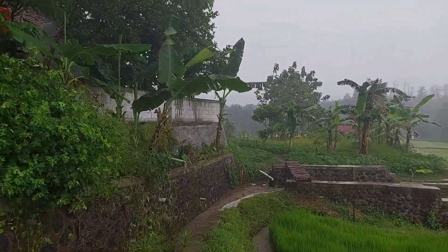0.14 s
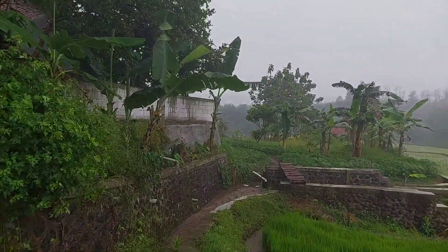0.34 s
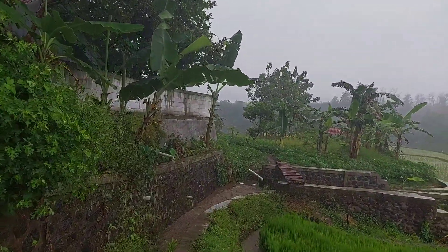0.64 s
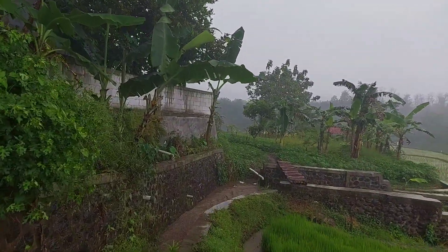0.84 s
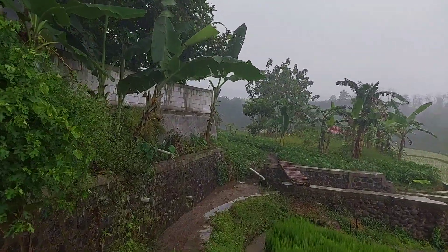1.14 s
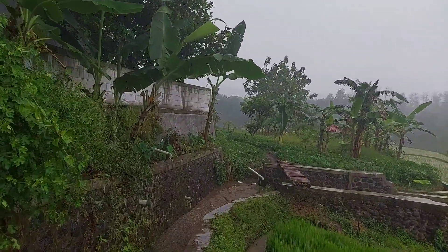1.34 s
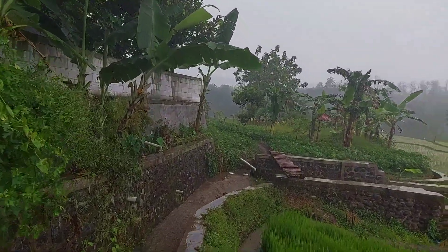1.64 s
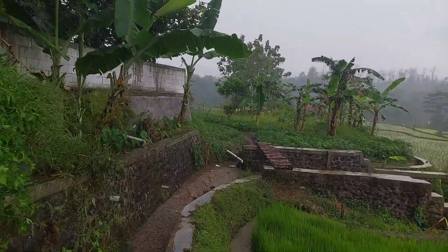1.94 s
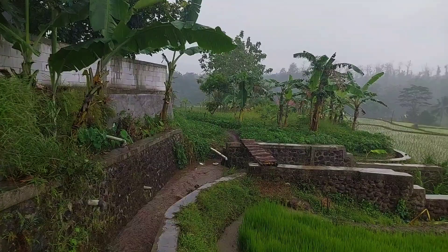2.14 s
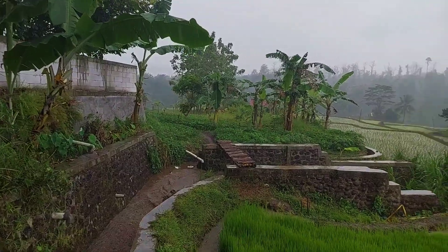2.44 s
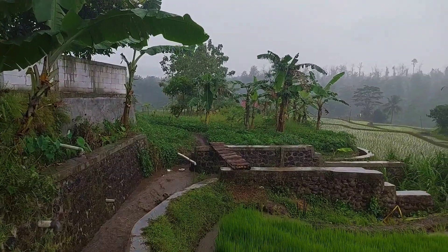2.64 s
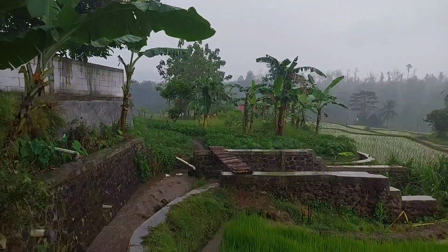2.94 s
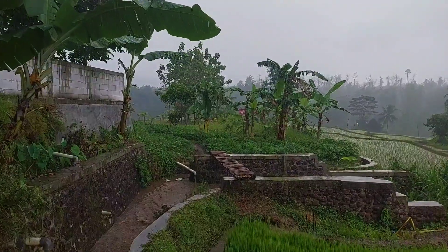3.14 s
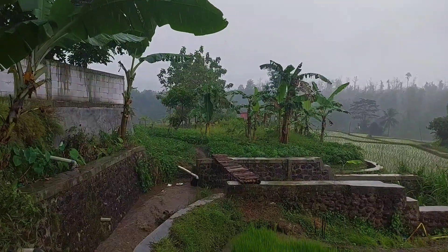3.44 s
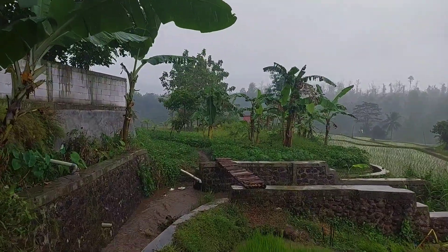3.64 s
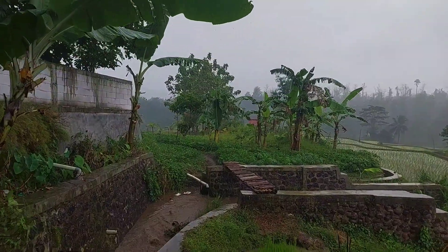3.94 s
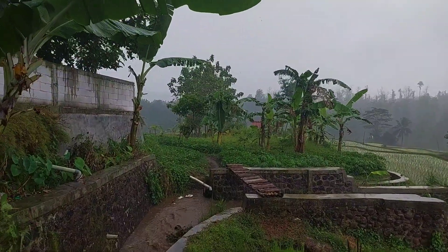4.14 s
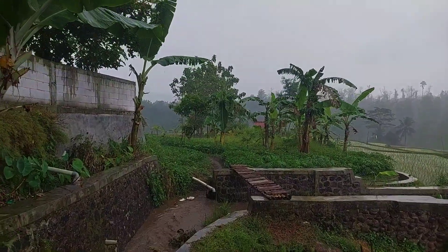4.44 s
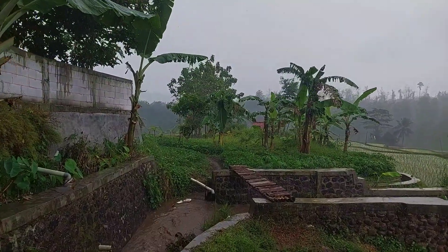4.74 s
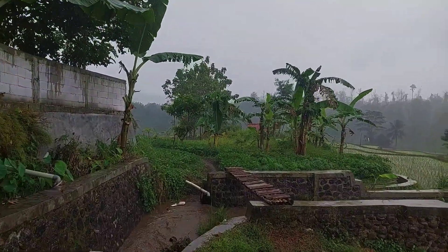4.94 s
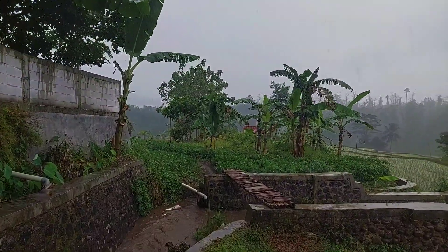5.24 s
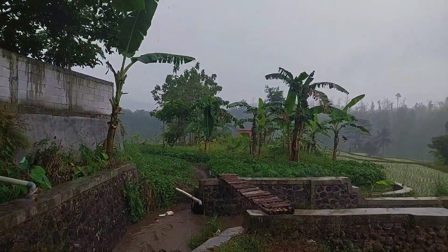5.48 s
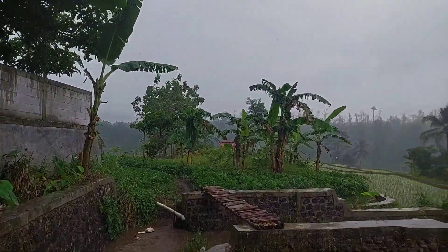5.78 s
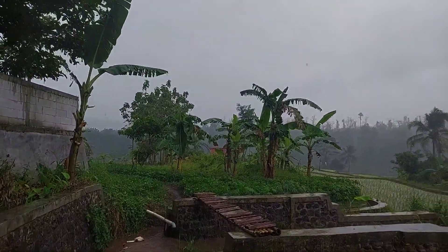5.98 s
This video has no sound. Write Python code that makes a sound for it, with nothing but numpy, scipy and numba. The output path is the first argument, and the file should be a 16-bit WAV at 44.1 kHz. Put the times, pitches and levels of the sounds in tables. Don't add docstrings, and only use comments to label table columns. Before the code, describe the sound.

Steady heavy rain heard through wet, muffled microphones, with drops knocking on the housing, wind buffeting, and hard hits that suddenly duck the whole sound.

```python
import sys
import numpy as np
from scipy import signal
from scipy.fft import rfft, irfft
from scipy.io import wavfile
from scipy.ndimage import uniform_filter1d
from numba import njit

SR = 44100
rng = np.random.default_rng(int(sys.argv[2]) if len(sys.argv) > 2 else 0)


def boost(x):
    u = np.asarray(x, float) / 20
    return 10 ** u


def dump_mix(stems):
    frames = np.atleast_2d(stems).T
    limited = np.clip(frames, -1, 1)
    pcm = np.round(limited * 32767).astype(np.int16)
    wavfile.write(sys.argv[1], SR, pcm)


N = 269451
PORT_LAG, LAG_SPREAD = -13., 14.


def colour(x, table):
    size = 8192
    hz, db = np.transpose(table)
    bins = np.arange(size // 2 + 1) * SR / size
    log_gain = np.interp(np.log(bins + 1), np.log(hz), db) * np.log(10) / 20
    cepstrum = irfft(log_gain)
    cepstrum[1:size // 2] *= 2
    cepstrum[size // 2 + 1:] = 0
    response = irfft(np.exp(rfft(cepstrum)))[:size // 2]
    run_up = np.r_[x[-size:], x]
    return signal.fftconvolve(run_up, response)[size:size + len(x)]


def band(x, hz, kind, order):
    return signal.sosfilt(signal.butter(order, hz, kind, fs=SR, output="sos"), x)


def level(x, db):
    return x * boost(db) / np.sqrt(np.mean(x ** 2))


def curve(s, value):
    return np.interp(np.arange(N) / SR, s, value)


def walk(rate):
    k = int(SR / rate)
    steps = np.repeat(rng.standard_normal(N // k + 1), k)
    return uniform_filter1d(uniform_filter1d(steps, k), k)[:N]


def self_noise():
    # (frequency [Hz], gain [dB])
    hiss_shape = [(100, -12), (6000, -27), (8500, 6), (9500, -6), (12000, 3.5), (15000, 6)]
    return np.array([level(colour(x, hiss_shape), -77.) for x in rng.standard_normal((2, N))])


def wind():
    # (frequency [Hz], gain [dB])
    buffet = [(22, -35), (45, -9), (72, 8.5), (110, 0.5), (150, -13.5), (250, -36.5), (600, -88.5)]
    # (time [s], level [dB], left minus right [dB])
    puffs = [(.1, -41, -12), (.3, -27, -3), (.6, -33.5, -2.5), (.72, -31, -6), (.85, -30, -10),
             (1.1, -41.5, -15), (1.32, -29.5, -5), (1.6, -42, -3.5), (1.87, -37.5, -4), (2.1, -42, -1),
             (2.3, -29.5, -3), (2.55, -33, -14), (2.8, -36, -13.5), (3.03, -26.5, -11), (3.3, -36, -6),
             (3.58, -42, -4), (3.87, -36.5, -14.5), (4.02, -36.5, -2.5), (4.12, -38, -7.5),
             (4.33, -34, -15), (4.55, -40, -26.5), (4.8, -34, -12), (5.27, -36, -8.5), (5.52, -31.5, -6.5),
             (5.8, -31, -15), (6.05, -39, -30.5)]
    half_length_s = 0.088
    t, out = np.arange(N) / SR, []
    for side, lull_db in ((1, -45.5), (-1, -40)):
        push = boost(lull_db)
        for s, db, pan_db in puffs:
            push = push + boost(db + side * pan_db / 2) * np.exp(-((t - s) / half_length_s) ** 2)
        unevenness = boost(-6.5 + 1.6 * walk(10.0))
        out.append(push * unevenness * level(colour(rng.standard_normal(N), buffet), 0))
    return np.array(out)


@njit
def grains(start, hz, cycles, left, right, lag, count):
    out = np.zeros((2, count + 8192))
    for k in range(len(start)):
        p = np.exp((2j * np.pi - 1 / cycles[k]) * hz[k] / SR)
        z, i = 1. + 0j, int(start[k]) + 64
        for n in range(min(int(6 * cycles[k] * SR / hz[k]), 8000)):
            out[0, i + n + int(lag[k])] += left[k] * z.imag
            out[1, i + n] += right[k] * z.imag
            z *= p
    return out[:, 64:count + 64]


def rain(pan_db=4.5, cycles=0.76, far_db=3.5, shower_db=2.5):
    drops_per_s, scatter_db, largest = 3000, 2.6, .998
    when, pitch, size, side, turn = rng.random((int(drops_per_s * N / SR), 5)).T
    hz = 120 * 60 ** pitch
    peak = np.sign(turn - .5) * hz * boost(-scatter_db * np.log(1 - largest * size))
    pan = boost(pan_db * (side - .5))
    lag = PORT_LAG + LAG_SPREAD * (side - .5)
    near = grains(when * N, hz, cycles + 0 * hz, peak * pan, peak / pan, lag, count=N)
    fan = rng.standard_normal((5, N))
    late = [np.roll(x, int(PORT_LAG + LAG_SPREAD * (k / 4 - .5))) for k, x in enumerate(fan)]
    wash = level(np.array([sum(late), sum(fan)]), far_db)
    apart = level(rng.standard_normal((2, N)), 1.)
    return boost(shower_db * walk(11)) * level(near, 0) + wash + apart


def shower():
    # (time [s], level [dB])
    strength = [
        (0, -0.5),
        (.5, -1.0),
        (1.17, 1.4),
        (1.72, -2),
        (2.5, 0.44),
        (4.5, 0),
        (4.8, 1.5),
        (6.11, 1.9),
    ]
    return boost(-16.5 + curve(*np.transpose(strength))) * rain()


def ticks(gain_db, late=.001):
    # (time [s], peak [dB], left minus right [dB])
    knocks = [(0.137, -12.5, 6), (0.533, -19.5, -9), (0.593, -13.5, -10.5), (0.619, -11.5, 2.5),
              (1.209, -18.5, -11.5), (1.305, -16, -5.5), (1.546, -25, 15), (1.609, -11, -3),
              (2.223, -39, 12.5), (2.832, -34.5, 6.5), (2.959, -38, -12.5), (3.119, -30.5, -19.5),
              (3.293, -28, 3), (3.492, -30, -1.5), (3.748, -22.5, -3.5), (4.058, -18.5, 2),
              (4.101, -18.5, 12.5), (4.197, -19.5, 16.5), (4.387, -17.5, 0), (4.592, -13, 13),
              (5.559, -29.5, -20), (5.744, -20.5, 3), (5.885, -23.5, -14.5), (6.018, -21.5, -7),
              (6.06, -23, 8)]
    # (time [s], peak [dB], left minus right [dB], click [dB], bright tick [dB])
    splats = [(0.093, -13, -1, -38, -55), (0.25, -13, 1, -35, -56), (0.258, -25.5, -9.5, -27.5, -57),
              (0.283, -23, 4.5, -33.5, -53.5), (0.303, -17.5, -8, -31.5, -66),
              (0.345, -6.5, 0.5, -18.5, -65.5), (0.422, -24, -12.5, -36, -51.5),
              (0.434, -20, 10, -35.5, -61), (0.455, -8.5, -17, -28, -71), (0.496, -20.5, -5.5, -31, -57),
              (0.625, -26.5, 0, -45.5, -62), (0.734, -19, -13, -25, -67), (1.085, -19, 19, -39.5, -60),
              (1.12, -15, -4.5, -46, -53), (1.271, -30.5, 0.5, -46, -67), (1.941, -35, -6.5, -49, -84),
              (3.093, -40, -10, -47, -83), (3.643, -24, -6, -44.5, -84), (3.845, -20.5, 5.5, -51, -66),
              (3.855, -23, -17.5, -44.5, -70), (5.313, -30, -19.5, -30.5, -40),
              (1.729, -30, 20, -35, -43.5)]
    soft = [(s, db, pan_db, db - 26.5, db - 57) for s, db, pan_db in knocks]
    s, db, pan_db, click_db, tick_db = np.transpose([*splats, *soft])
    held_db = gain_db[(s * SR).astype(int)]
    same = 0 * s
    out = 0
    for hz, cycles, part_db in ((690, 0.37, db + 15.5),
                                (1460, 0.54, click_db + 35.0),
                                (4300, 0.73, tick_db + 63.5)):
        left = boost(part_db - held_db + pan_db / 2)
        right = boost(part_db - held_db - pan_db / 2)
        part = grains((s + late) * SR, hz + same, cycles + same, -left, -right, PORT_LAG + same, count=N)
        out = out + band(part, [hz / 1.67, hz * 2.0], "band", order=2)
    return out


def wet_ports(air):
    # (frequency [Hz], gain [dB])
    left_port = [(30, -16.5), (130, -14), (300, -11), (470, -7), (560, 1), (650, -7.5), (745, -4.5),
                 (920, -21), (1100, -15.5), (1300, -24.5), (2000, -34.5), (3000, -47.5), (5000, -70),
                 (7000, -90.5)]
    right_port = [(30, -26), (130, -13), (210, -13), (400, -14), (600, -13), (820, -1.5), (990, 1.5),
                  (1250, -11.5), (1500, -18.5), (2000, -27), (3000, -39), (4000, -48), (5000, -58.5),
                  (7000, -75.5)]
    # (frequency [Hz], gain [dB])
    housing = [(100, -60), (170, 4.5), (200, 12.5), (240, 1.5), (400, -47.5)]
    drum = level(colour(air[0], housing), -53.5)
    return drum + np.array([colour(air[0], left_port), colour(air[1], right_port)])


def gain_control():
    # (time [s], held gain [dB], brief extra dip [dB], recovery of the dip [s])
    ducks = [
        (1.174, 1, -5, 0.13),
        (1.725, -15, -10, 0.022),
        (2.506, -16.5, -16, 0.058),
        (4.551, 10, -1, 0.0087),
        (5.02, 0, -1.5, .015),
        (5.317, -13.5, -8.5, 0.061),
    ]
    close_s, dip_close_s, hold_s = .008, 0.0036, 1.05
    release_db_per_s, ease_s = 23, 0.12
    t = np.arange(N) / SR
    knee_db = release_db_per_s * ease_s
    holds, dips = [], 0
    for s, held_db, dip_db, back_s in ducks:
        climbed = held_db + release_db_per_s * np.maximum(t - s - hold_s, 0)
        eased = -knee_db * np.log1p(np.exp(-climbed / knee_db))
        holds.append(np.clip((t - s) / close_s, 0, 1) * eased * (held_db < 0))
        recovery = np.exp(-np.maximum(t - s, 0) / back_s)
        dips = dips + dip_db * np.clip((t - s) / dip_close_s, 0, 1) * recovery
    return np.min(holds, axis=0) + dips


def swell(t, hz, rise_cycles, t60):
    return (1 - np.exp(-t * hz / rise_cycles)) ** 2 * 1000. ** (-t / t60)


def strikes(rise_cycles=0.16, top_hz=2300, bass_hz=120, lopsided=0.13, leak_db=-16):
    # (time [s], first swing, ring [Hz], t60 [s],
    # overload)
    left_strikes = [
        (-.0004, -.1, 700, .01, .9),
        (1.7286, -.45, 620, .011, 1.3),
        (1.7308, .55, 570, .022, 1.9),
        (2.5098, .64, 563, .021, 11.0),
        (4.5521, -.8, 520, .013, .1),
        (5.0236, -.25, 750, .004, .3),
        (5.0247, -.7, 430, .007, .25),
        (5.2825, -.16, 560, .03, .2),
        (5.2965, -.2, 560, .03, .2),
    ]
    right_strikes = [
        (-.0003, -.12, 900, .01, .9),
        (1.1765, -.85, 690, .008, .2),
        (5.2955, -.22, 960, .03, .3),
        (5.3124, -.3, 800, .005, .3),
        (5.3156, .55, 880, .0055, 4.5),
        (5.3185, -.2, 820, .03, .2),
    ]
    # (time [s], port [0 left, 1 right], first swing, pitch [Hz], t60 [s])
    thumps = [(.095, 0, -.3, 300, .016), (.131, 0, -.22, 380, .02), (.347, 0, -.35, 400, .025),
              (.6793, 0, .5, 160, .018), (1.1765, 1, -.6, 300, .018), (1.7286, 0, -.4, 300, .03),
              (1.739, 0, .25, 57, .09), (2.5215, 0, -.5, 235, .022), (2.5205, 0, .2, 75, .08),
              (4.5515, 0, -.5, 280, .016), (5.0245, 0, -.7, 250, .012), (5.026, 0, .3, 75, .04),
              (5.0325, 0, -.45, 80, .06), (5.3157, 1, -.36, 330, .018), (5.3195, 1, -.4, 190, .025),
              (5.3365, 1, -.45, 72, .12)]
    out, t = np.zeros((2, N + 2 * SR)), np.arange(SR // 4) / SR
    hits = [(0, *r) for r in left_strikes] + [(1, *r) for r in right_strikes]
    for port, s, swing, hz, t60, overload in hits:
        rise = rise_cycles / np.sqrt(min(overload, 1))
        ring = swell(t, hz, rise, t60) * (np.sin(2 * np.pi * hz * t) + lopsided)
        ring = overload * ring / np.abs(ring).max()
        ring = np.clip(ring, -1, 1) / min(overload, 1)
        start = int((s + 1) * SR)
        out[port, start:start + len(t)] += swing * ring
    out = band(out, top_hz, "low", order=2) + boost(leak_db) * out
    out = band(out, bass_hz, "high", order=1)
    for s, port, swing, hz, t60 in thumps:
        heave = swell(t, hz, 0.11, t60) * np.sin(2 * np.pi * hz * t)
        start = int((s + 1) * SR)
        out[int(port > .5), start:start + len(t)] += swing * heave
    return out[:, SR:SR + N]


def scene():
    gain_db = gain_control()
    air = shower() + ticks(gain_db)
    ducked = boost(gain_db) * (wet_ports(air) + wind() + self_noise())
    converter_floor = boost(-99.0) * rng.standard_normal((2, N))
    return ducked + strikes() + converter_floor


def roll_off(x):
    return signal.sosfilt(signal.butter(12, 15600, fs=SR, output="sos"), x)


def record(dry):
    return roll_off(np.clip(dry, -1, 1))


dry = scene()
out = record(dry)
dump_mix(out)
```